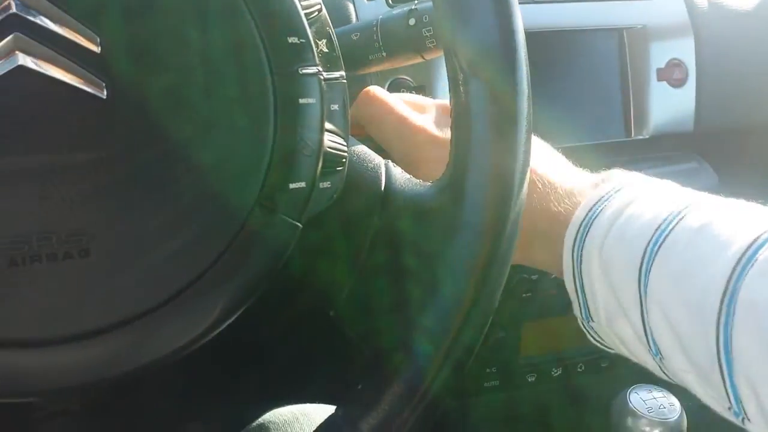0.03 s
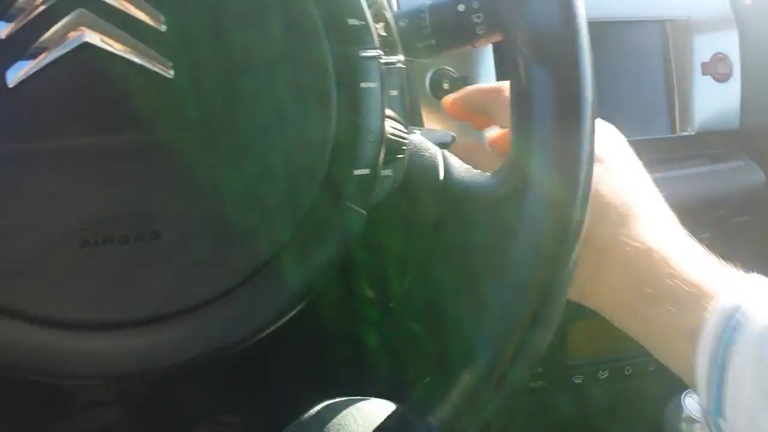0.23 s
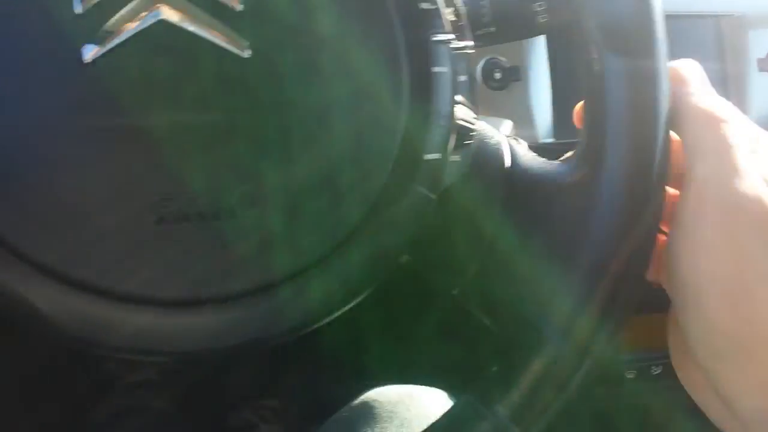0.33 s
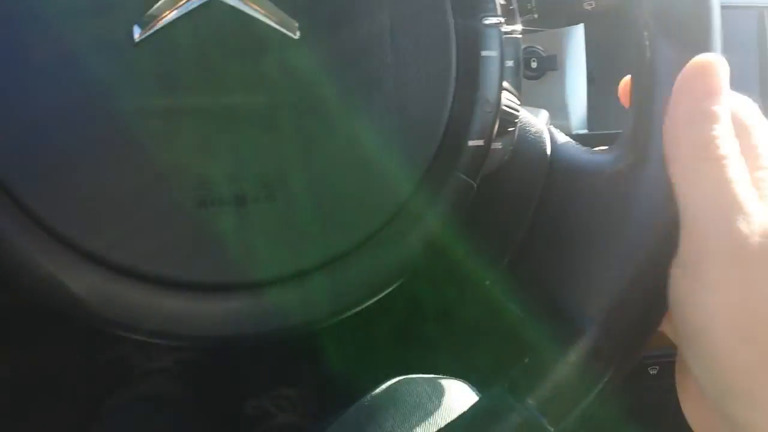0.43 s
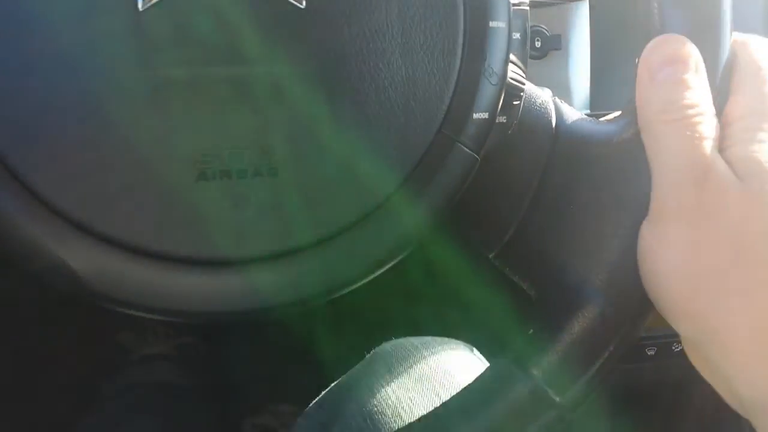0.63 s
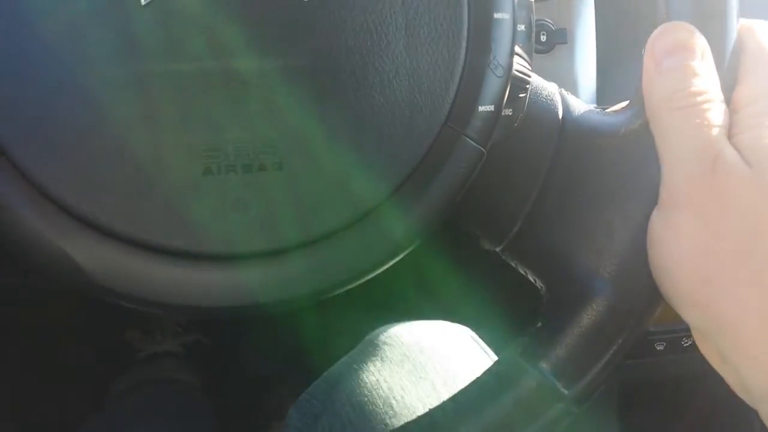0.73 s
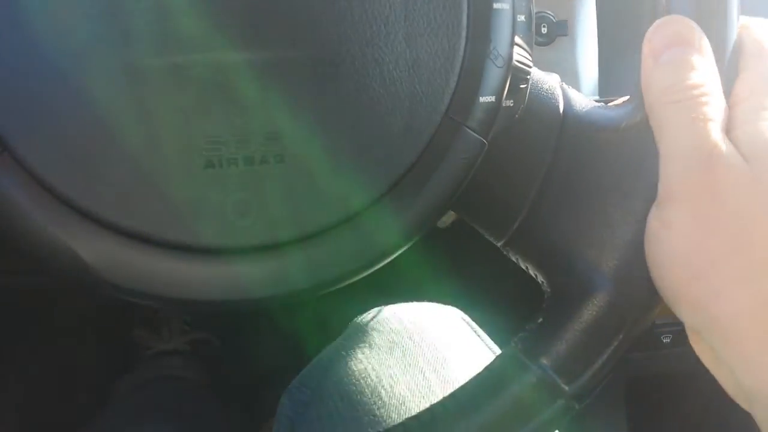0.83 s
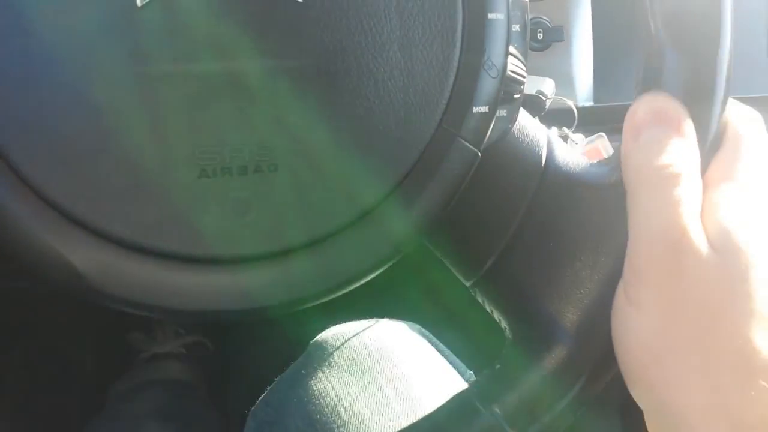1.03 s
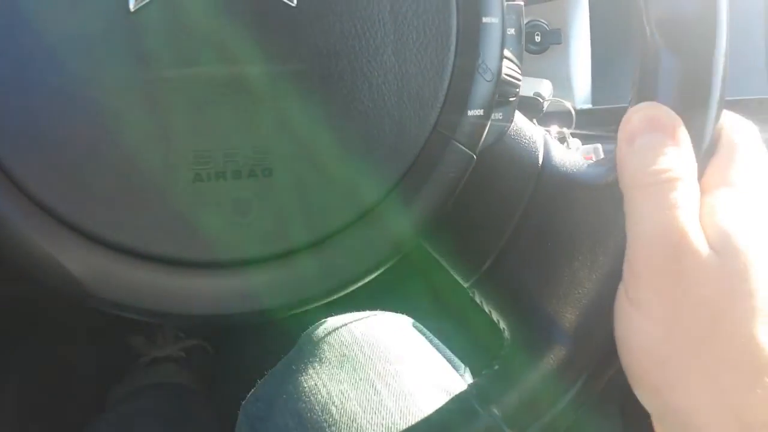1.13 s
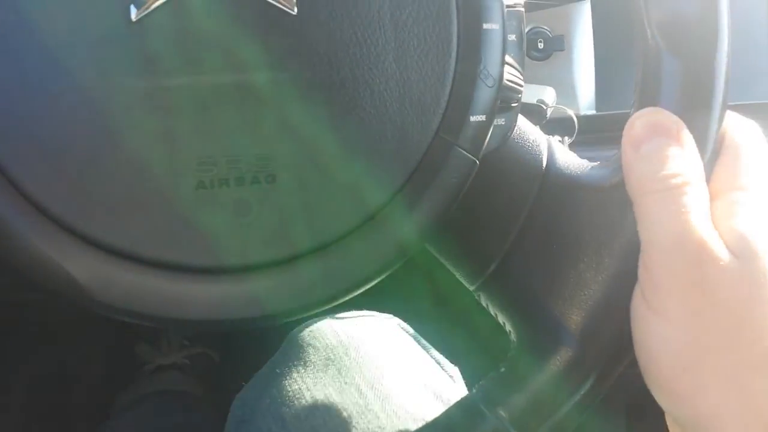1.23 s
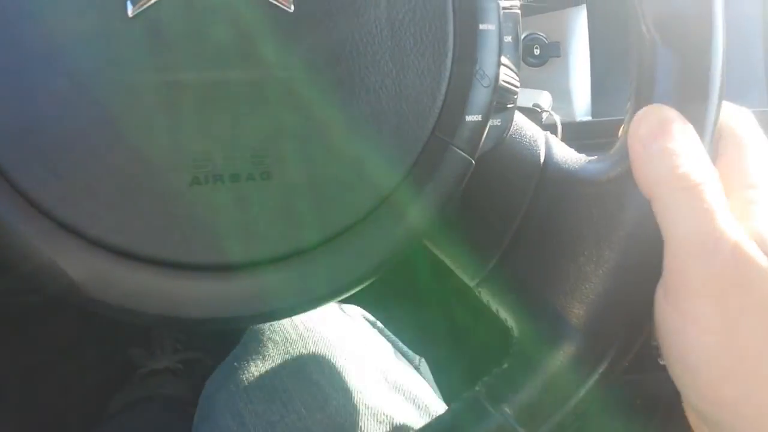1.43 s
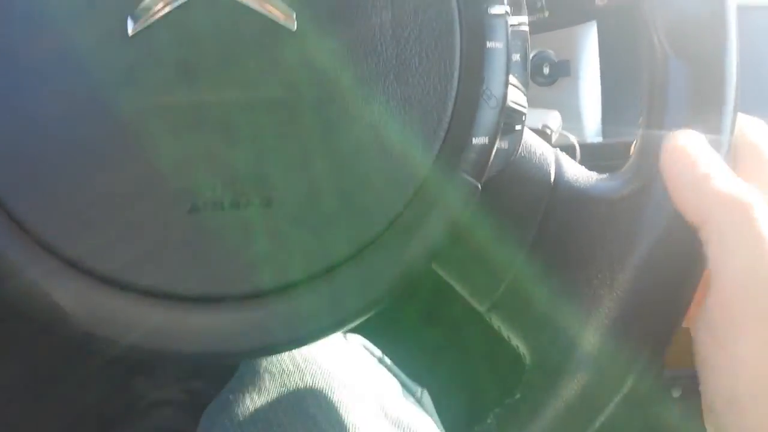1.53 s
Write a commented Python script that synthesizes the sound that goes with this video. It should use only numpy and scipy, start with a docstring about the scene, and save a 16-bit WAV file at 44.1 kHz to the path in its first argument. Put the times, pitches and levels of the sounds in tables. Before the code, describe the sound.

Keys jingle at the ignition inside a quiet car and a hard plastic knock follows, close on the right. The keys tick lightly, then a latch scrapes and clunks over soft rustling and a low hum.

```python
"""Keys at the ignition

Inside a quiet car, on two closely spaced microphones. To the right, a bunch of keys jingles and a
hard knock rings the plastic shroud of the steering column. The keys swing and tick on while a hand
slides round the wheel; then a latch scrapes and clunks home, shaking the cabin. Clothes rustle
softly, and a low hum runs underneath and grows after the clunk."""
import sys
import numpy as np
from scipy import signal
from scipy.fft import rfft, irfft, next_fast_len
from scipy.io import wavfile
from scipy.ndimage import uniform_filter1d

SR = 44100
rng = np.random.default_rng(int(sys.argv[2]) if len(sys.argv) > 2 else 0)


def generate_wav(sig):
    """Save sig (samples, or channels by samples) to the path in sys.argv[1] as 16-bit PCM at SR."""
    pcm = np.round(np.clip(np.atleast_2d(sig).T, -1, 1) * 32767).astype(np.int16)
    wavfile.write(sys.argv[1], SR, pcm)


N = 70560
LEFT_LAG_S, THUD_ATTACK_S = .000173, .003

# modes of car body and cabin: f/Hz, level/dB, t60/s
BODY_MODES = [(34.3, -5, 0.81), (109.1, -4.5, 0.32), (129, -8, 0.46), (189.3, 7.5, 0.12), (296, 8.5, 0.063),
              (329.6, -9, 0.24), (408, -16, 0.22), (487, -4, .07)]


def undb(db):
    """Decibels to gain."""
    return 10 ** (np.asarray(db) / 20)


def curve(points):
    """Gain over time through points of t/s, level/dB."""
    return undb(np.interp(np.arange(N) / SR, *np.array(points).T))


def colour(x, points, tilt_db=0, pivot_hz=5000):
    """Minimum-phase filter through points of f/Hz, level/dB, tilted per octave above the third point."""
    n = x.shape[-1]
    size = 2 * next_fast_len(n)
    octave = np.log2(np.maximum(np.fft.rfftfreq(size, 1 / SR), 10))
    hz, db = np.array(points).T
    from_pivot = np.maximum(octave, np.log2(hz[2])) - np.log2(pivot_hz)
    gain = undb(np.interp(octave, np.log2(hz), db) + tilt_db * from_pivot)
    cepstrum = irfft(np.log(gain))
    cepstrum[1:size // 2] *= 2  # folding makes the filter causal
    cepstrum[size // 2 + 1:] = 0
    return irfft(rfft(x, size) * np.exp(rfft(cepstrum)))[..., :n]


def diffuse(n, split_hz=1040):
    """Noise at two close microphones: alike in the bass, unrelated in the treble."""
    mid, side = rng.standard_normal((2, n))
    side = signal.sosfilt(signal.butter(1, split_hz, "high", fs=SR, output="sos"), side)
    return np.array([mid + side, mid - side])


def unit(x):
    """Scale a stereo hit to the energy of 10 ms at full level."""
    return x / np.sqrt(np.sum(x ** 2) / (2 * .01 * SR))


def burst(points, t60, tilt_db=0):
    """A contact scattered by the cabin: dense reflections that die quickly."""
    t = np.arange(SR // 4) / SR
    reflections = diffuse(len(t)) * undb(-60 * t / t60)
    return unit(colour(reflections, points, tilt_db))


def ring(modes, lag_s=0, scatter=0, alternate=False, attack_s=.0019):
    """Decaying modes, optionally of alternating sign; scatter varies level and phase per microphone."""
    t = np.maximum(np.arange(SR // 2) / SR - np.array([[lag_s], [0]]), 0)
    out = 0
    for k, (hz, db, t60) in enumerate(modes):
        strength, phase = scatter * rng.standard_normal((2, 2, 1))
        tone = np.sin(2 * np.pi * hz * t + phase + np.pi * k * alternate)
        out = out - undb(db + 2 * strength - 60 * t / t60) * tone
    return unit(out * np.minimum(t / attack_s, 1))


def add(out, s, sound):
    """Mix a sound in at s seconds."""
    i = int(s * SR)
    out[:, i:i + sound.shape[1]] += sound[:, :max(N - i, 0)]


def drift(rate_hz):
    """Slow random wander with a spread near 1."""
    hold = int(SR / rate_hz)
    steps = np.repeat(rng.standard_normal(N // hold + 1), hold)
    return uniform_filter1d(steps, hold)[:N]


def wash(points, rough_db=0):
    """Continuous coloured noise; rough_db makes its grain uneven."""
    x = colour(diffuse(N) * undb(rough_db * drift(90)), points)
    return x / np.std(x)


def cabin(hum_hz=56.7, waver=.015, hiss_db=-61):
    """Room tone of the car: a wavering low hum, rumble and faint hiss."""
    # harmonics of the hum, from the fundamental up: level/dB
    harmonics = [5.5, -13, -29, -27]
    # swells of hum and rumble: t/s, level/dB
    hum_level = [(0, -50), (.11, -63), (.22, -57.5), (.4, -55), (.58, -48.5), (.7, -59), (.82, -52),
                 (1.05, -50.5), (1.2, -50.5), (1.3, -49), (1.42, -44.5), (1.6, -52.5)]
    rumble_level = [(0, -62), (.14, -65), (.23, -50), (.33, -65), (.42, -48), (.6, -54), (.78, -51.5),
                    (.93, -68), (1.06, -45.5), (1.25, -48.5), (1.6, -50)]
    # spectra of rumble and hiss: f/Hz, level/dB
    rumble_colour = [(20, -15), (45, -7), (70, -6), (110, 3.5), (155, -6.5), (200, -5.5), (260, -17),
                     (600, -31), (2000, -43)]
    hiss_colour = [(100, -6), (250, -4), (700, -11), (1500, -15), (4000, -20), (10000, -19), (14000, -21.5)]
    phase = 2 * np.pi * np.cumsum(hum_hz * (1 + waver * drift(12))) / SR
    hum = sum(undb(db) * np.sin(k * phase + rng.uniform(0, 2 * np.pi))
              for k, db in enumerate(harmonics, 1))
    rumble = curve(rumble_level) * wash(rumble_colour)
    hiss = undb(hiss_db) * wash(hiss_colour)
    return curve(hum_level) * hum / np.std(hum) + rumble + hiss


def hand(bump_t60=.11):
    """The hand slides along the rim of the wheel and bumps the trim; clothes rustle."""
    # strokes along the rim: start/s, peak/s, end/s, level/dB
    strokes = [(0.12, 0.143, 0.16, -59.5), (0.496, 0.774, 0.914, -53), (1.26, 1.398, 1.51, -55)]
    # friction spectra of hand and clothes: f/Hz, level/dB
    slide_colour = [(200, -11.5), (600, -3), (1150, 1), (1500, -4.5), (2200, -12), (5000, -19),
                    (14000, -25)]
    rustle_colour = [(100, -21), (200, 0), (300, -1), (460, -1.5), (620, -11), (1300, -16.5), (2500, -21),
                     (6000, -25.5), (14000, -29)]
    # swell of the rustle: t/s, level/dB
    rustle_level = [(0, -97), (.2, -57), (.55, -61.5), (.92, -60.5), (1.05, -56.5), (1.2, -54.5),
                    (1.35, -51.5), (1.5, -49.5), (1.6, -55)]
    # soft bumps of hand and arm: t/s, level/dB, f/Hz
    bumps = [(0.194, -50.5, 208), (0.252, -45.5, 204), (1.05, -47.5, 197), (1.266, -47, 434),
             (1.415, -45.5, 335), (1.486, -45, 292)]
    t = np.arange(N) / SR
    sliding = sum(undb(db) * np.interp(t, [start, peak, end], [0, 1, 0])
                  for start, peak, end, db in strokes)
    out = sliding * wash(slide_colour)
    out += curve(rustle_level) * wash(rustle_colour, rough_db=2.5)
    for s, db, hz in bumps:
        add(out, s, undb(db) * ring([(hz, 0, bump_t60)]))
    return out


def keys(crack_db=-6.5, tail_db=-1.5):
    """Keys clash with a crisp crack and a short scatter; the one that is struck rings briefly."""
    # key on key: t/s, clash level/dB, ring level/dB, ring f/Hz, treble tilt/(dB per octave)
    contacts = [(.182, -50, -71, 4200, -4), (0.1967, -38.5, -58, 4250, 6.5),
                (0.2003, -37.5, -47.5, 4400, 2.5), (0.211, -36, -35, 4190, -1), (.2165, -47, -35, 4160, 3),
                (.223, -32.5, -30.5, 4190, -0.5), (0.2246, -34.5, -38, 4420, 0),
                (.239, -43, -63, 4430, -2.5), (.252, -43.5, -53.5, 4180, -2),
                (0.265, -44.5, -64, 4190, -6.5), (0.2768, -49, -58, 4190, -1.5),
                (.373, -47, -49, 4230, 0.5), (0.4184, -37.5, -47, 4440, 11.5),
                (.425, -39.5, -51.5, 4430, 2), (0.446, -50, -70, 4500, 1.5), (0.4575, -48, -63, 4340, 1.5),
                (0.475, -46.5, -69, 4220, 1.5), (0.4839, -43.5, -54, 4290, 0.5),
                (0.53, -55.5, -70, 4200, 1), (.541, -53, -72, 4120, 1.5), (0.6129, -53, -55, 4200, -1.5),
                (0.735, -62, -64, 4020, -1), (0.807, -53, -62, 4230, -6), (0.818, -49.5, -74, 4250, -3.5),
                (0.8556, -49.5, -60.5, 4050, -1), (0.9804, -40, -48, 3930, -4),
                (1.0155, -46.5, -60, 4550, 1), (1.03, -51, -67, 4230, -5), (1.236, -59.5, -78, 4140, 2)]
    # modes of a key: multiple of its pitch, level/dB, t60/s
    key_modes = [(.8, -14, .06), (1, 0, .06), (1.06, -13, .045), (1.175, -13, .05), (2.93, -14, .06)]
    # spectrum of a clash: f/Hz, level/dB
    clash_colour = [(300, -23.5), (800, -3), (1400, 5.5), (2700, -0.5), (4400, 3), (6500, -5), (8300, 3),
                    (10000, -3), (12500, 0), (15000, -15.5)]
    out = np.zeros((2, N))
    for s, clash_db, ring_db, hz, tilt_db in contacts:
        add(out, s, undb(clash_db + crack_db) * burst(clash_colour, t60=.03, tilt_db=tilt_db))
        add(out, s, undb(clash_db + tail_db) * burst(clash_colour, t60=.07, tilt_db=tilt_db))
        modes = [(hz * ratio, db, t60) for ratio, db, t60 in key_modes]
        add(out, s, undb(ring_db) * ring(modes, scatter=.22))
    return out


def column_knock(body_db=-35):
    """A double snap and a light rebound ring the plastic shroud; the first blow stirs the car body."""
    # blows on the shroud: t/s, snap level/dB, ring level/dB
    blows = [(.371, -29, -22), (.3736, -20, -33), (.383, -30.5, -35.5)]
    # modes of the shroud: f/Hz, level/dB, t60/s
    shroud_modes = [(180, -15.5, 0.089), (265, -11, 0.12), (360, -0.5, 0.065), (425, -8.5, 0.11),
                    (506.5, -8, 0.12), (730, -5.5, 0.078), (844, -9, 0.073), (902, 3, 0.08),
                    (1174, -20, 0.077), (1410, 8.5, 0.049), (1469, -7, 0.1), (1635, 4, 0.019),
                    (1730, 5.5, 0.044), (2200, -6.5, 0.14), (2900, 1, 0.059)]
    # spectrum of the knock: f/Hz, level/dB
    shroud_colour = [(100, -19.5), (230, -3), (380, 0), (900, 5.5), (1500, 4), (2000, -8), (2800, -5.5),
                     (3100, -17.5), (4000, -28.5), (7000, -36), (14000, -46)]
    impulse = np.zeros((2, SR // 10))
    impulse[:, 0] = -1
    snap = unit(colour(impulse, shroud_colour))
    out = np.zeros((2, N))
    for s, snap_db, ring_db in blows:
        add(out, s, undb(snap_db) * snap)
        add(out, s, undb(ring_db) * burst(shroud_colour, t60=.076))
        add(out, s, undb(ring_db) * ring(shroud_modes, LEFT_LAG_S, scatter=.43, alternate=True))
    add(out, blows[0][0], undb(body_db) * ring(BODY_MODES, alternate=True, attack_s=THUD_ATTACK_S))
    return out


def latch_clunk(ring_db=-2):
    """A latch scrapes, seats, and thuds into the body of the car."""
    # contacts of the latch: t/s, level/dB, treble tilt/(dB per octave)
    contacts = [(1.079, -41, 0.5), (1.0837, -34, 1.5), (1.0871, -34.5, 7.5), (1.0944, -25.5, -0.5),
                (1.097, -27, 5), (1.102, -33.5, -0.5), (1.119, -44, 1)]
    # modes of the latch: f/Hz, level/dB, t60/s
    latch_modes = [(746.4, 5.5, 0.075), (870, -8, .07), (960, -1.5, 0.089), (1030, 2.5, 0.082),
                   (1320, 4.5, 0.062), (1473, -7, 0.086), (1800, 5, 0.046), (2638, -3, 0.079)]
    # spectrum of a contact: f/Hz, level/dB
    latch_colour = [(200, -5.5), (550, -7.5), (800, 7.5), (1500, 4.5), (2200, -2), (4600, -8.5),
                    (7500, -20.5), (10000, -17), (14500, -41)]
    # thuds into the body: t/s, level/dB
    thuds = [(1.1006, -25.5), (1.1114, -22)]
    out = np.zeros((2, N))
    for s, db, tilt_db in contacts:
        add(out, s, undb(db) * burst(latch_colour, t60=.055, tilt_db=tilt_db))
        add(out, s, undb(db + ring_db) * ring(latch_modes, LEFT_LAG_S, scatter=.67))
    for s, db in thuds:
        add(out, s, undb(db) * ring(BODY_MODES, attack_s=THUD_ATTACK_S))
    return out


def scene():
    """Keys and mechanisms lie close by on the right, so each microphone hears its own colour."""
    # left microphone minus right: f/Hz, level/dB
    balance = [(100, 1.5), (350, -0.5), (700, -2), (1400, -4), (2500, 2), (4500, 0), (8000, -2),
               (12000, -9.5)]
    near = keys() + column_knock() + latch_clunk() + hand()
    left = colour(near[0], [(hz, db / 2) for hz, db in balance])
    right = colour(near[1], [(hz, -db / 2) for hz, db in balance])
    return np.array([left, right]) + cabin()


def record(dry):
    """The recorder cuts off steeply above 14.7 kHz."""
    return signal.sosfilt(signal.ellip(8, .2, 70, 14700, fs=SR, output="sos"), dry)


dry = scene()
out = record(dry)
generate_wav(out)
```